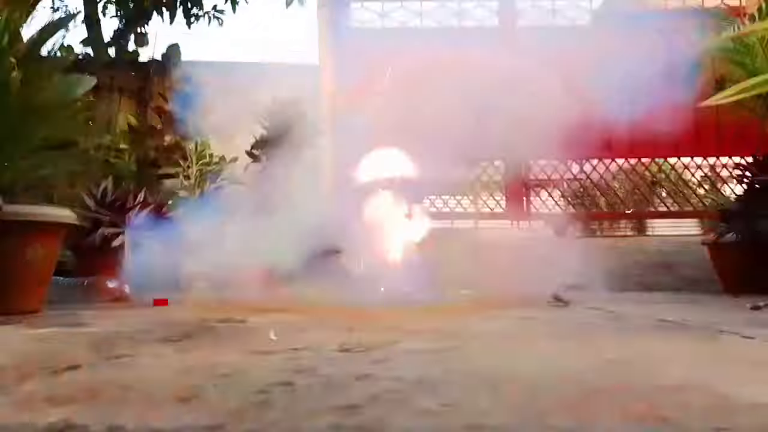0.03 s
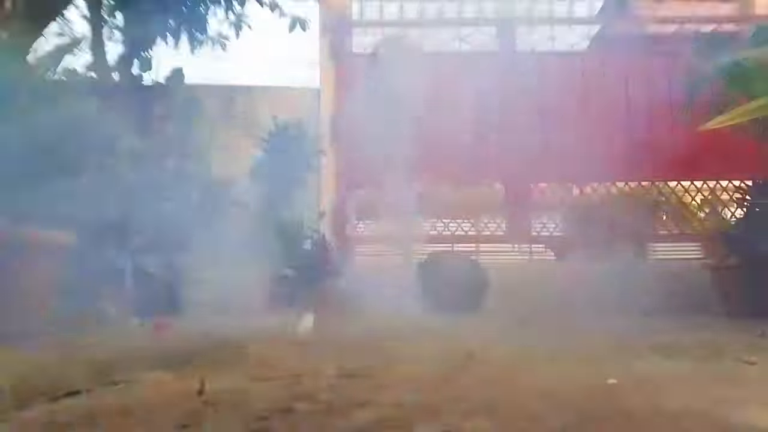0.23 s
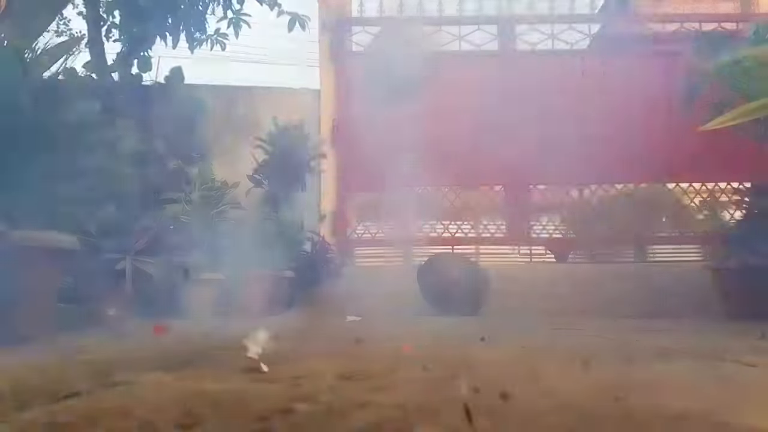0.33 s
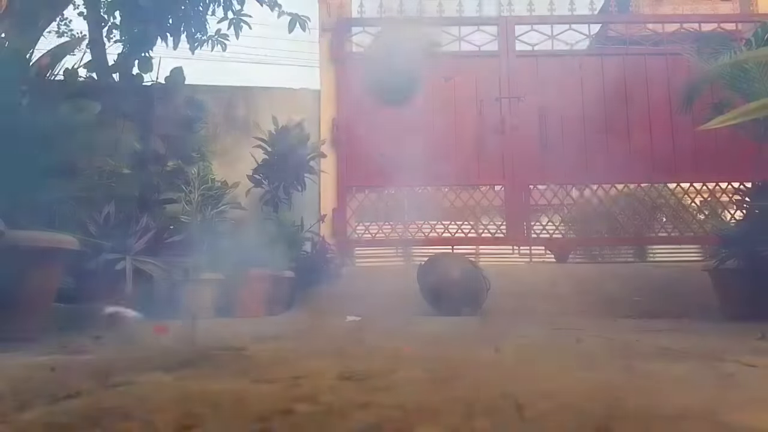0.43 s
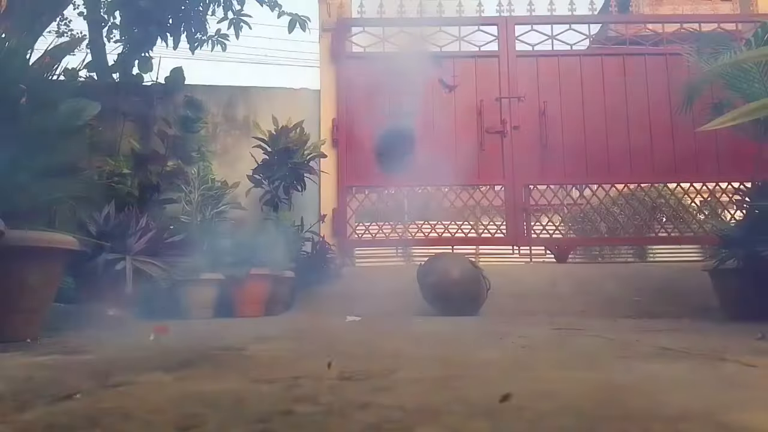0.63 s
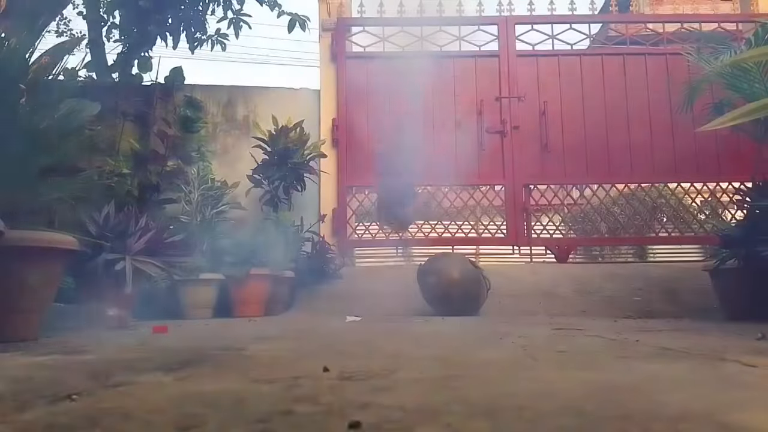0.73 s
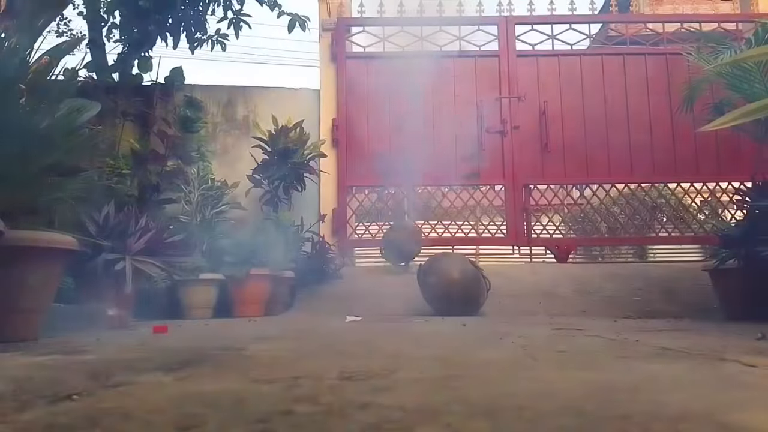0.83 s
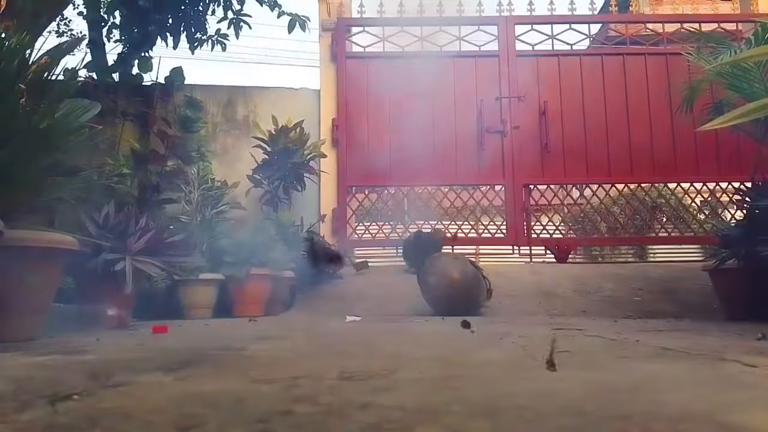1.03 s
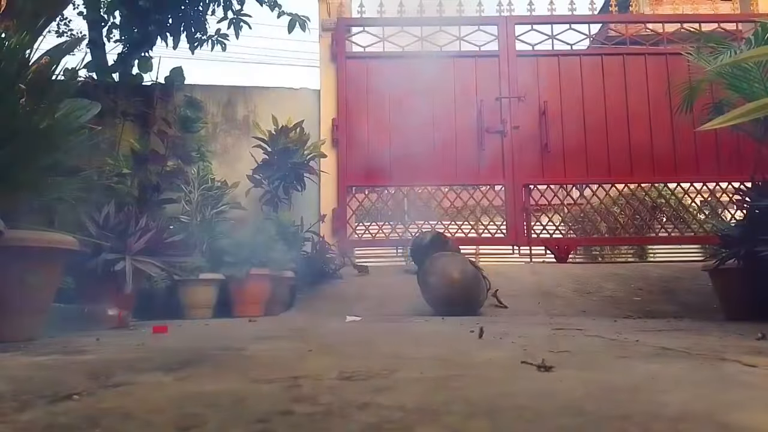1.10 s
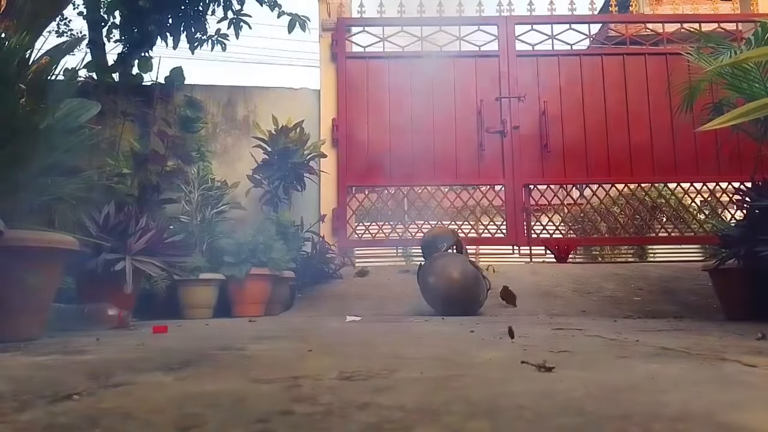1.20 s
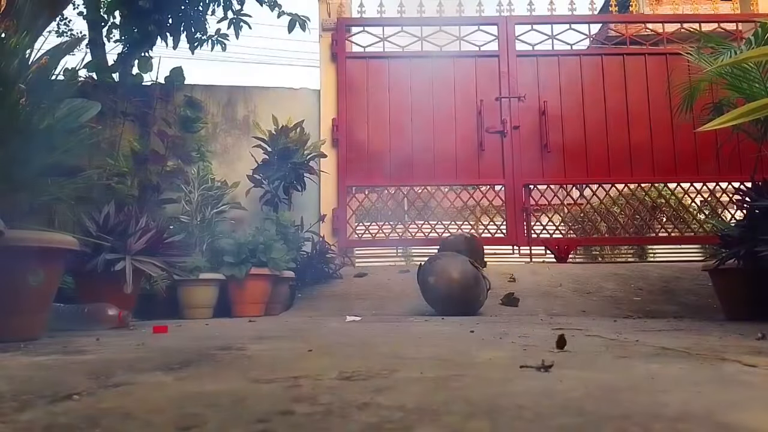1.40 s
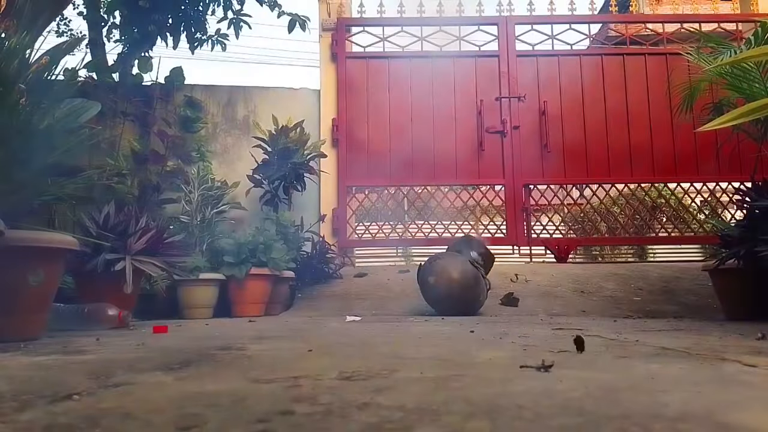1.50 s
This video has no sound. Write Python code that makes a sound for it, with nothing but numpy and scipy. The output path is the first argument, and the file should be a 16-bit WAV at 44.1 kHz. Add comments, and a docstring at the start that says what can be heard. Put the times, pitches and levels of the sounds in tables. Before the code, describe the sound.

A firecracker bangs in a yard, then a pot lands ringing and fragments clatter.

```python
"""A moment of faint outdoor hum and thin whistle, then a bright crack: a firecracker blows under a pot
in a walled yard and overloads the microphone. A boom follows, and echoes roll back from the houses.
Grit patters down, the thrown pot lands with a ringing knock, and fragments clatter after it.
The blast and grit are made of shaped noise; the pot's knock and ring are made of fading tones."""
import sys
import numpy as np
from scipy import signal
from scipy.fft import rfft, irfft
from scipy.io import wavfile
from scipy.ndimage import uniform_filter1d

SR = 44100
rng = np.random.default_rng(int(sys.argv[2]) if len(sys.argv) > 2 else 0)


def file_out(sig):
    """Save sig as 16-bit WAV at sys.argv[1]."""
    # one column per channel
    cols = np.atleast_2d(sig).T
    # limit, then scale
    lim = np.clip(cols, -1, 1)
    pcm = np.round(lim * 32767).astype(np.int16)
    wavfile.write(sys.argv[1], SR, pcm)


N = 68355
BANG_S = 0.2392

# The crack's tone colour. Each row: frequency in Hz, relative level in dB.
CRACK_COLOUR = [(30, -9), (110, -45), (220, 2.5), (450, 8), (900, 3), (1600, -4), (3000, -5.5),
                (5800, -4.5), (8600, 6.5), (11000, -3.5), (15500, -12)]

def crack(t, hold_s=0.039, build_s=0.11, shock_hz=860):
    """The shock rattles between the near walls, holds briefly, gains body and dies from the top down."""
    age = t - BANG_S
    burst = noise(CRACK_COLOUR)
    air = highs(burst, 10080)
    body = burst - highs(burst, 1100)
    body_gain = gain(-11.5 * np.clip(1 - age / build_s, 0, 1))  # starts weak, grows to full
    lower = burst - air + body * (body_gain - 1)
    tail = lower * fade(age - hold_s, 0.45) + air * fade(age - hold_s, 0.34)
    shock = cut_bass(ping(age - 0.00142, shock_hz, 0.0069), shock_hz / 2, order=2)
    return gain(5) * shock + gain(-1) * (age >= 0) * tail

# The boom and its echoes. Each row: peak time, rise time and fade time in seconds,
# then rumble, roar and treble levels in dB.
BOOMS = [(.315, 0.031, 0.7, -31.5, -6.5, -11.5), (0.387, 0.035, 0.61, -2.5, -10.5, -34),
         (0.597, 0.059, 0.73, -8.5, -14.5, -21), (.655, 0.033, 0.72, -11, -15, -46),
         (0.859, 0.06, 0.73, -16.5, -29.5, -64), (0.923, 0.0048, 0.077, -13, -50, -38),
         (1.3, 0.095, 1.6, -35.5, -52, -49)]
# The boom's low, middle and high colours. Each row: frequency in Hz, relative level in dB.
RUMBLE_COLOUR = [(25, -47), (60, -58), (90, -17.5), (130, -3), (200, 0), (350, 0), (600, -7.5), (1200, -37),
                 (3000, -48)]
ROAR_COLOUR = [(80, -35), (200, -27), (380, -4), (700, 3), (1100, -4.5), (1600, -16), (3000, -32),
               (6000, -61)]
TREBLE_COLOUR = [(600, 3.5), (1500, 5), (3200, 3.5), (5800, -2.5), (8600, 1.5), (11500, -18), (15500, -39)]

def boom_and_echoes(t, flutter_db=1.5):
    """The boom swells after the crack and returns from houses further and further off."""
    power = np.zeros((3, N))
    for peak, rise_s, fade_s, *levels_db in BOOMS:
        swell = np.exp(-(np.minimum(t - peak, 0) / rise_s) ** 2 / 2)
        power += (gain(levels_db)[:, None] * swell * fade(t - peak, fade_s)) ** 2
    colours = (RUMBLE_COLOUR, ROAR_COLOUR, TREBLE_COLOUR)
    bands = np.array([noise(colour) * gain(flutter_db * wander(89.08)) for colour in colours])
    return (t >= BANG_S) * (np.sqrt(power) * bands).sum(axis=0)

# Dull thuds. Each row: start in seconds, pitch in Hz, level in dB, fade time in seconds.
LOW_THUDS = [(.851, 153.6, -11.5, 0.19), (.916, 165, 0, 0.042)]

def thuds(t, rise_s=0.0021):
    """Short low tones thud at the end of the rumble."""
    return sum(gain(db) * np.clip((t - start) / rise_s, 0, 1) * ping(t - start, hz, fade_s)
               for start, hz, db, fade_s in LOW_THUDS)

# The pot, then its fragments, hitting the ground. Each row: start in seconds, relative knock level in dB,
# knock pitch multiplier, clack level in dB, clack centre in Hz, tick level in dB, fade time in seconds.
LANDINGS = [(1.0593, 0.5, 1.064, -8, 1560, -6.5, 0.024), (1.09, -37, 1., -36, 2500, -21.5, 0.0228),
            (1.2226, -20, 1.08, -16.5, 2600, -20, 0.017), (1.272, -12, 0.93, -20, 2210, -20, 0.038),
            (1.2824, -13, 1, -20.5, 2130, -26, 0.13), (1.313, -14.5, .95, -21, 3000, -34, 0.07),
            (1.33, -13.5, 0.75, -49, 2000, -41, .03), (1.358, -31, 0.81, -33, 3000, -25.5, 0.025),
            (1.4614, -39, 1., -55, 2060, -38, 0.024), (1.4871, -63, 1.15, -57, 2000, -27, 0.01)]
# The tones in a knock. Each row: base pitch in Hz, relative level in dB, fade time in seconds.
KNOCK_TONES = [(490, -3, .024), (630, 0, .024), (860, -9, .01), (1130, -2, .014), (1620, -6, .018),
               (2080, -11, .02)]
# The clack's colour. Each row: multiple of its centre frequency, relative level in dB.
CLACK_COLOUR = [(.07, -38), (.2, -12), (.5, 1), (1, -2.5), (1.6, -4), (2.6, -14), (7, -24)]
# The colours of the tick and the yard's echo. Each row: frequency in Hz, relative level in dB.
TICK_COLOUR = [(1500, -2.5), (5500, -16.5), (8300, 3.5), (11000, -10.5), (15500, -19)]
YARD_COLOUR = [(60, -36), (150, -24), (300, -2.5), (400, -5.5), (520, 0.5), (800, -9), (1200, -1),
               (1450, -8), (3200, -13), (5800, -20.5), (8600, -8), (11500, -24.5), (15500, -30)]

def landings(t, yard_db=-16.5, yard_fade_s=0.98, yard_build_s=0.0098):
    """Each landing gives a dull knock, a gritty clack and a sharp tick, and the yard rings on."""
    tick = noise(TICK_COLOUR)
    direct = yard_power = 0
    for start, knock_db, pitch, clack_db, clack_hz, tick_db, fade_s in LANDINGS:
        age = t - start
        knock = sum(gain(db) * ping(age, hz * pitch, ring_s) for hz, db, ring_s in KNOCK_TONES)
        clack = noise([(ratio * clack_hz, db) for ratio, db in CLACK_COLOUR])
        direct += gain(knock_db) * knock / 2
        direct += strike(age, fade_s) * (gain(clack_db) * clack + gain(tick_db) * tick)
        direct += gain(tick_db - 1) * ping(age, 8440, 0.0033)  # bright click of contact
        build = 1 - np.exp(-np.maximum(age, 0) / yard_build_s)
        yard_power += (gain(clack_db) ** 2 + gain(tick_db) ** 2) * (build * fade(age, yard_fade_s)) ** 2
    yard = gain(yard_db) * np.sqrt(yard_power) * noise(YARD_COLOUR)
    return cut_bass(direct, 330, order=5) + yard

# The pot's shorter ringing tones. Each row: pitch in Hz, level from the blast in dB,
# level from the landing in dB, fade time in seconds.
POT_TONES = [(343, -34, -36, 1), (492, -42, -27.5, 0.99), (570, -43, -40, 1.9), (1114, -42, -36, 0.56),
             (1175, -42, -27, 0.45)]

def pot_ring(t, main_hz=522, main_fade_s=4.4, build_s=0.45, waver_db=2.5):
    """The ring of the tumbling pot emerges from the blast; landing strikes its shorter tones again."""
    age, since_landing = t - BANG_S, t - LANDINGS[0][0]
    emerge = np.clip(age / build_s, 0, 1) ** 2
    # Two tones 11 Hz apart make the ring pulse.
    pair = ping(age, main_hz, main_fade_s) + gain(-10.5) * ping(age, main_hz - 11, main_fade_s)
    ring = gain(-17.5 + waver_db * wander(28.93)) * emerge * pair
    for hz, blast_db, landing_db, fade_s in POT_TONES:
        from_blast = gain(blast_db) * emerge * fade(age, fade_s)
        from_landing = gain(landing_db) * strike(since_landing, fade_s)
        level = np.hypot(from_blast, from_landing) * gain(waver_db * wander(34.9))
        ring += level * np.sin(2 * np.pi * hz * since_landing)
    return ring

# Falling bits of grit. Each row: start in seconds, level in dB, fade time in seconds.
GRIT_TICKS = [(0.695, -25, 0.018), (0.7233, -21.5, 0.0074), (0.74, -13.5, 0.0092), (.76, -24, .012),
              (0.781, -20.5, 0.0091), (0.818, -27.5, 0.017), (.848, -25.5, 0.034), (0.866, -33, 0.025),
              (.92, -30, .012), (.9345, -30, 0.068), (0.954, -25, 0.1)]
# The colour of grit and sand. Each row: frequency in Hz, relative level in dB.
GRIT_COLOUR = [(800, 4.5), (3000, -8.5), (5500, -13), (8600, 4), (11500, -8), (15500, -8.5)]

def grit(t, grains_per_s=480, scatter_db=7.5):
    """Single bits of grit tick on the concrete amid a fine rain of sand."""
    ticks = sum(gain(db) * strike(t - start, fade_s) for start, db, fade_s in GRIT_TICKS)
    ticks *= noise(GRIT_COLOUR)
    falling = (t > 0.66) & (t < 1.4)
    grains = falling * (rng.random(N) < grains_per_s / SR) * gain(scatter_db * rng.standard_normal(N))
    sand = signal.fftconvolve(grains, fade(t, 0.0071))[:N] * noise(GRIT_COLOUR)
    return ticks + gain(-42) * sand

# The colour of the distant town. Each row: frequency in Hz, relative level in dB.
TOWN_COLOUR = [(30, -25), (60, -10), (90, 1), (140, -13), (210, -5), (330, -2.5), (560, 1), (1200, -5),
               (1500, -13.5), (2200, -16.5), (3300, -13.5), (4400, -18.5), (6200, -23), (8500, -10.5),
               (11000, -22.5), (15500, -35)]

def outdoors(t, hum_hz=283, whistle_hz=3730):
    """Distant town noise, a wavering hum and a thin whistle that fades before the bang."""
    hum_pitch = hum_hz * (1 + 0.0061 * wander(35.9))
    hum = np.sqrt(2) * np.sin(2 * np.pi * np.cumsum(hum_pitch) / SR)
    phase = 2 * np.pi * whistle_hz * t
    whistle = normalise(wander(106) * np.sin(phase) + wander(106) * np.cos(phase))
    return gain(-40) * noise(TOWN_COLOUR) + gain(-41.5) * hum + gain(-38.5) * fade(t, 0.4) * whistle

def gain(db):
    """Turn decibels into a multiplier."""
    return 10 ** (np.asarray(db) / 20)

def normalise(x):
    """Scale a sound to an average power of 1."""
    return x / np.sqrt(np.mean(x ** 2) + 1e-18)

def noise(colour):
    """Noise with a given colour: how strong it is at each frequency."""
    hz, db = np.array(colour).T
    freqs = np.fft.rfftfreq(N, 1 / SR) + 1
    shape = gain(np.interp(np.log(freqs), np.log(hz), db))
    return normalise(irfft(rfft(rng.standard_normal(N)) * shape, N))

def wander(steps_per_s):
    """A smooth random drift, typically about 1 either side of zero."""
    width = int(SR / steps_per_s)
    steps = np.repeat(rng.standard_normal(N // width + 1), width)
    return 1.37 * uniform_filter1d(uniform_filter1d(steps, width), width)[:N]

def fade(age, fade_s):
    """Full level until age 0, then a fall of 60 dB in each fade time."""
    return np.exp(-np.log(1000) * np.maximum(age, 0) / fade_s)

def strike(age, fade_s):
    """Silence until age 0, then a jump to full level and a fade."""
    return (age >= 0) * fade(age, fade_s)

def ping(age, hz, fade_s):
    """One struck tone dying away."""
    return strike(age, fade_s) * np.sin(2 * np.pi * hz * age)

def highs(x, hz):
    """The part of a sound above a frequency, with no delay."""
    return signal.sosfiltfilt(signal.butter(4, hz, "high", fs=SR, output="sos"), x)

def cut_bass(x, hz, order):
    """Weaken everything below a frequency; a higher order cuts more steeply."""
    return signal.sosfilt(signal.butter(order, hz, "high", fs=SR, output="sos"), x)

def scene():
    """Blast, debris and background add up in one channel."""
    t = np.arange(N) / SR
    blast = crack(t) + boom_and_echoes(t) + thuds(t)
    return (blast + grit(t) + landings(t) + pot_ring(t) + outdoors(t))[None]

# Brief drops in loudness. Each row: start in seconds, end in seconds, level change in dB.
LEVEL_DIPS = [(0.193, 0.237, -17.5), (1.018, 1.06, -11.5)]

def record(dry, overload=0.74, top_hz=15550):
    """The microphone overloads and loses deep bass and top treble; the level dips before both big blows."""
    t = np.arange(N) / SR
    squashed = dry / (1 + (dry / overload) ** 4) ** (1 / 4)
    thinned = cut_bass(squashed, 65, order=1)
    dip_db = sum(db * ((t > start) & (t < end)) for start, end, db in LEVEL_DIPS)
    dipped = thinned * uniform_filter1d(gain(dip_db), size=40)
    return signal.sosfilt(signal.ellip(10, 0.2, 70, top_hz, fs=SR, output="sos"), dipped)

dry = scene()
out = record(dry)
file_out(out)
```